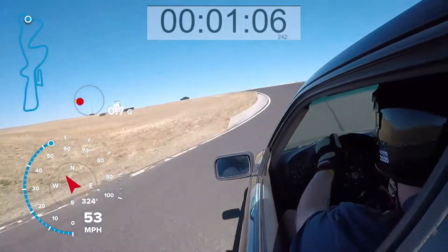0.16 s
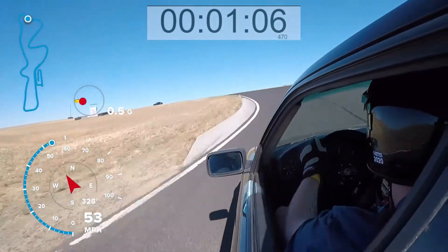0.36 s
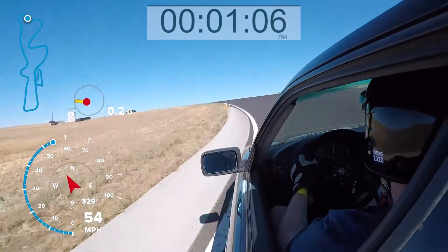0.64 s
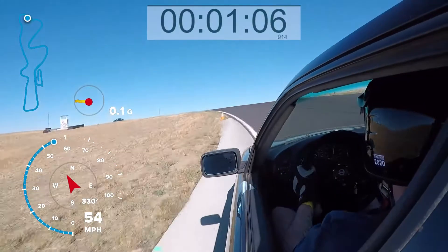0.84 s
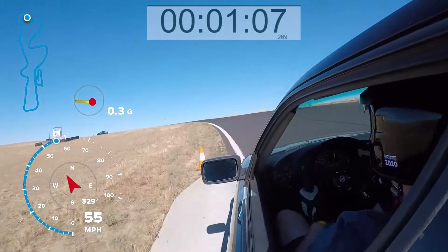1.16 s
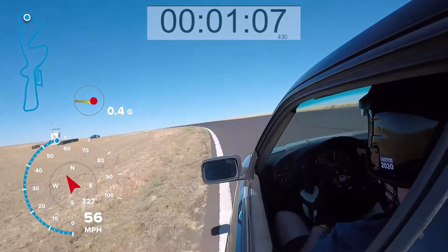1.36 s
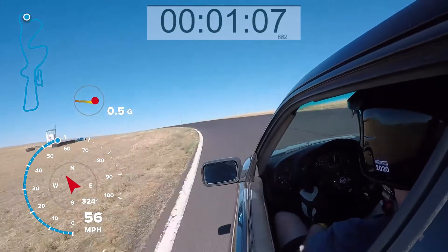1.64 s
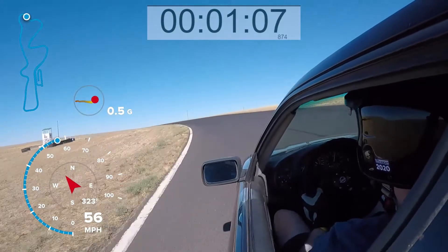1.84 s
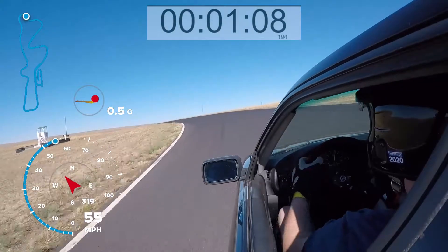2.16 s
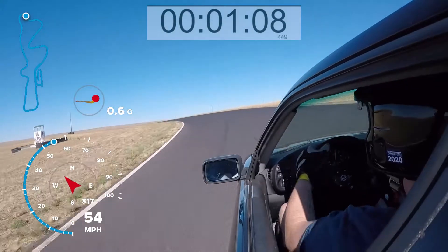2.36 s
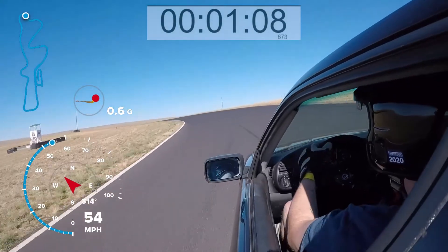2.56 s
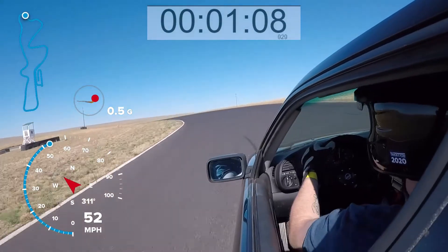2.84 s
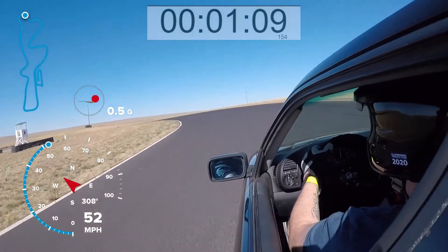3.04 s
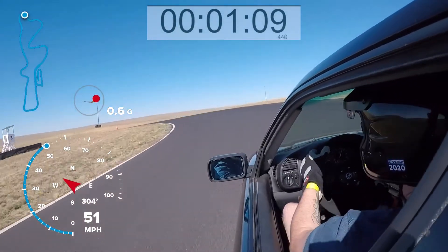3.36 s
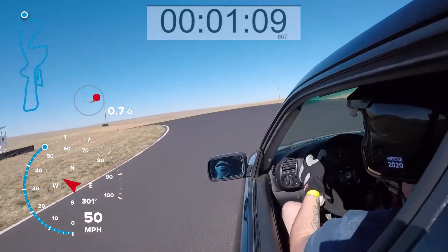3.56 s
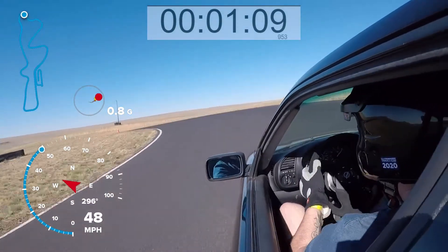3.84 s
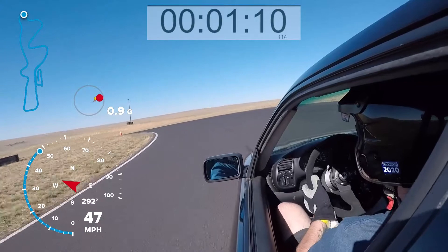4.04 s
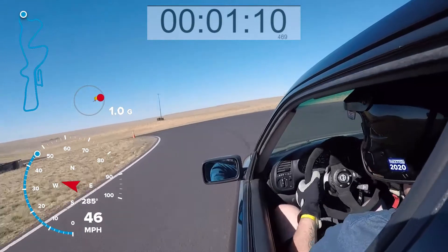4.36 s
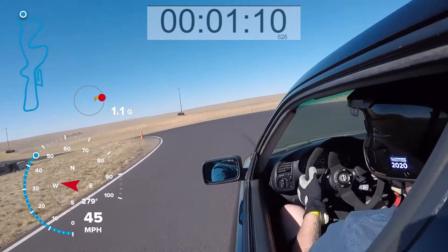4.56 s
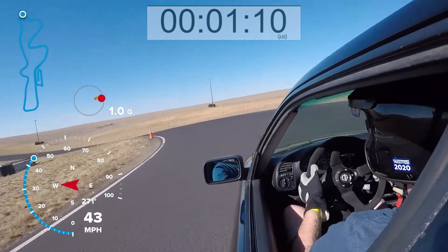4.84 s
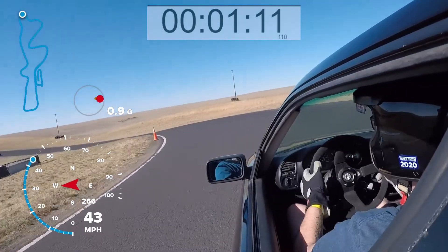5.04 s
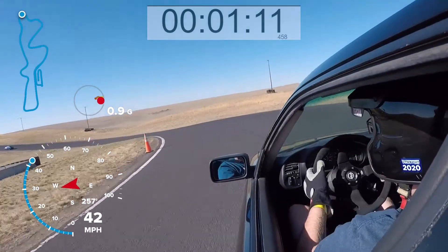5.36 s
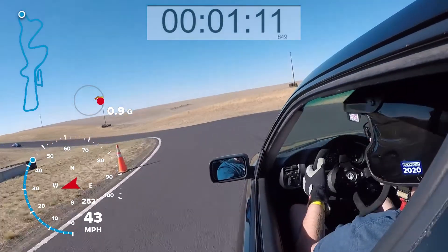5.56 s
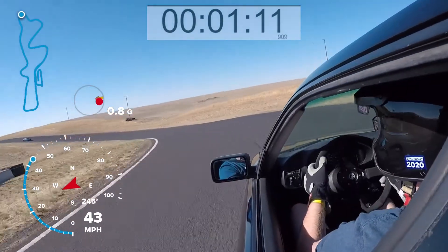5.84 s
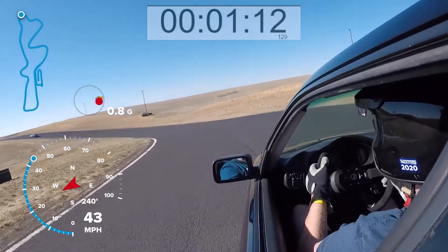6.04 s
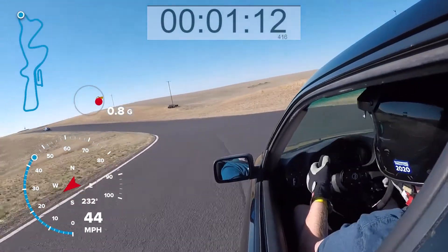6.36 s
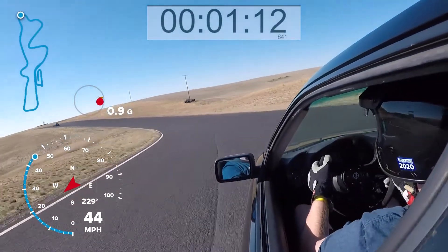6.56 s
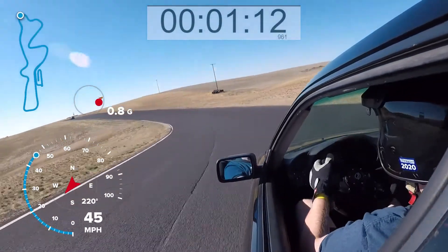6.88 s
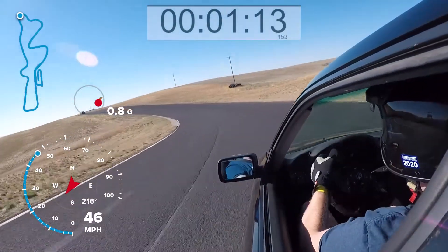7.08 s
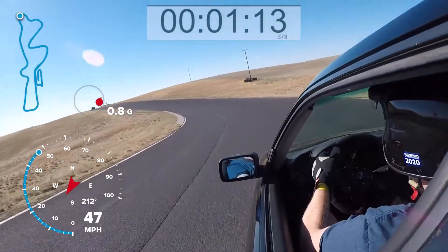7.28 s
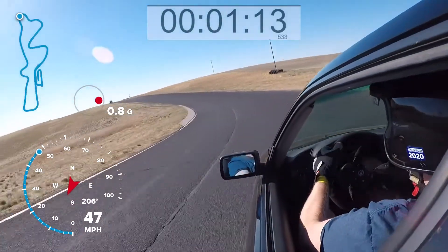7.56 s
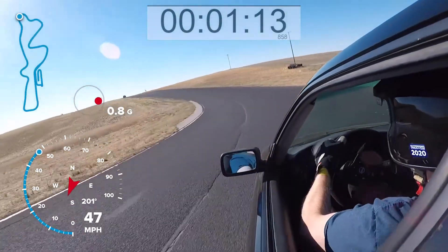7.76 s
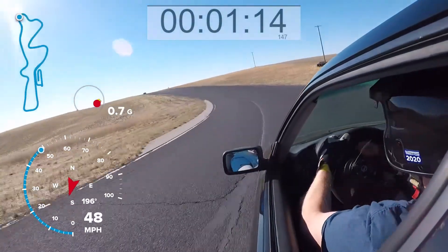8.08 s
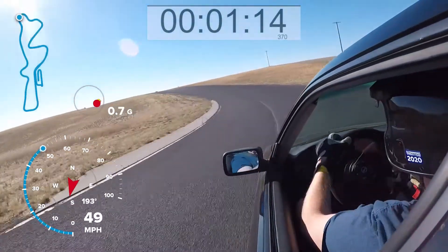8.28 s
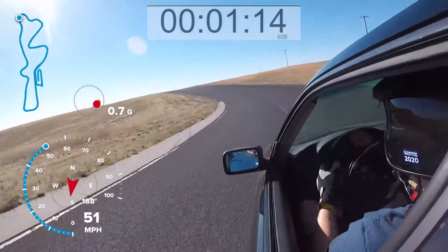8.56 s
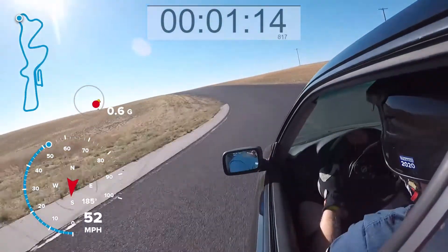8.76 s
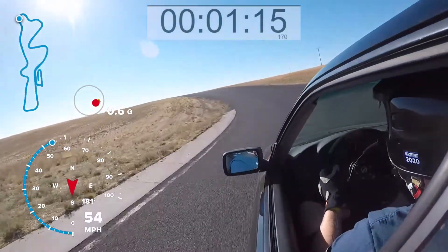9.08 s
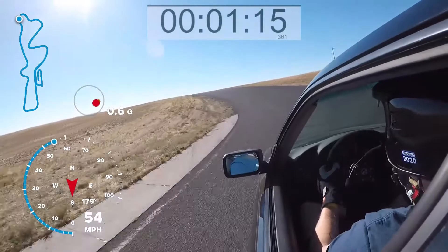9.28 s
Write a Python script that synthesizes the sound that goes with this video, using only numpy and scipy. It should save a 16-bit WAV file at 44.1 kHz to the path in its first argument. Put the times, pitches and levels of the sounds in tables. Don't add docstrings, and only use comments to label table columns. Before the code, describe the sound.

Loud raspy race-car exhaust at an open window: full pull, popping lift-off, quick downshift blip, rising howl, banging upshift, with tyre roar and wind rumble.

```python
import sys
import numpy as np
from scipy import signal
from scipy.fft import rfft, irfft, next_fast_len
from scipy.io import wavfile
from scipy.ndimage import uniform_filter1d, map_coordinates

SR = 44100
rng = np.random.default_rng(int(sys.argv[2]) if len(sys.argv) > 2 else 0)


def to_linear_factor(level_db):
    exponent = np.asarray(level_db, float) / 20
    return 10 ** exponent


def dump(signal):
    limited = np.clip(np.atleast_2d(signal).T, -1, 1)
    pcm = np.round(limited * 32767).astype(np.int16)
    wavfile.write(sys.argv[1], SR, pcm)


N = 415422
STRIDE = 64

# (time [s], speed [km/h])
SPEED_KMH = [(0, 85), (1.7, 90), (3.75, 79), (5.3, 68), (7.6, 75), (9.42, 88)]
# (frequency [Hz], density [dB/Hz])
BUFFET_SPECTRUM_DB = [(8, -120), (14, -13), (26, 5), (40, -3.5), (85, -12), (140, -19), (300, -74.5),
                      (600, -120)]
# (time [s], peak [dB])
GUSTS_DB = [(.07, -25.5), (0.349, -27), (.55, -26), (1.129, -17), (1.63, -21.5), (1.86, -23), (2.269, -21),
            (3.0, -21), (3.55, -25.5), (4.1, -25.5), (5.94, -27), (6.45, -34.5), (7.03, -18.5), (7.34, -29),
            (7.51, -28), (8.78, -34), (9.36, -23.5)]
# (frequency [Hz], density [dB/Hz])
ROAD_SPECTRUM_DB = [(35, -19.5), (60, -6.5), (96, -8), (166, -7.5), (300, -12.5), (650, -20), (800, -19.5),
                    (900, -23.5), (1430, -24.5), (2080, -36), (4940, -48.5), (9000, -64.5), (12000, -78),
                    (16000, -93), (22000, -120)]
# (time [s], peak [dB])
LINKAGE_DB = [
    (1.45, -52),
    (2.93, -40),
    (2.998, -49),
    (3.955, -51),
    (4.343, -37),
    (6.998, -43),
    (7.346, -38),
]
# (time [s], peak [dB], pitch [Hz], hold [s])
AFTERFIRES = [(0.032, -15.5, 112, 0.033), (1.401, -8, 77.6, 0.042), (1.455, -10, 90.6, 0.079),
              (1.618, -16, 83, 0.015), (2.254, -13, 73, 0.012), (2.87, -16, 70, 0.027),
              (2.929, -8.5, 77.1, 0.017), (2.964, -10.5, 81, 0.018), (3.065, -21, 70, 0.01),
              (3.078, -15, 74.6, 0.0058), (4.335, -2.5, 82.83, 0.0017), (4.375, -11, 84.1, 0.0068),
              (6.876, -6, 86.1, 0.03), (6.96, -7.5, 78, 0.045), (7.047, -9.5, 86.9, 0.022),
              (7.346, -10, 69.6, 0.0095), (8.775, -14, 68.9, 0.015)]
# (time [s], four-stroke cycle rate [Hz])
CYCLE_RATE_HZ = [(0, 34.18), (1.05, 35.43), (2.45, 32.68), (2.645, 30.94), (2.85, 37.82), (3.05, 38.57),
                 (3.3, 41.34), (3.49, 45.26), (3.7, 43.57), (4.28, 41.15), (4.95, 41.06), (5.5, 41.83),
                 (6.82, 45.83), (7.34, 38.6), (7.45, 37.8), (7.63, 30.64), (7.75, 31.99), (9.42, 36.47)]
# (time [s], exhaust blast [dB], load [0-1])
THROTTLE_DB_LOAD = [(0, -33, 0.96), (1.03, -32, 0.91), (1.26, -51.5, .55), (1.46, -61.5, 0.1),
                    (2.655, -70, 0), (2.666, -36.5, 0.7), (2.79, -37, 0.96), (2.95, -59, 0.04),
                    (4.12, -58, 0.08), (4.56, -62.5, 0.39), (4.9, -41, 0.84), (5.88, -31.5, 0.96),
                    (6.81, -29, 0.9), (6.915, -52.5, 0.1), (7.33, -53.5, 0), (7.37, -51, 0.55),
                    (7.49, -37.5, 0.87), (9.42, -29.5, .95)]
# (cycle rate [Hz], gain [dB])
SHAKE_GAIN_DB = [(32, 7.5), (35, 9), (38, 8), (42, 1.5), (46, 7.5)]
# (frequency [Hz], density [dB/Hz])
VALVE_SPECTRUM_DB = [(1500, -65), (2700, -5), (3600, 1.5), (4900, -20.5), (5600, -15.5), (6300, -23.5),
                     (8000, -42), (12000, -91)]
# (frequency [Hz], gain [dB])
BODY_GAIN_DB = [(100, -40), (250, -5), (330, -2.5), (460, -8), (600, 0), (680, -9), (745, 3.5), (800, -2),
                (860, -25), (1200, -9), (1500, -40.5)]
BLOCK_ORDERS = [8, 9, 11, 13, 15, 16, 17, 18, 19, 21, 22, 23, 24]
BLOCK_LOAD_DB = [0.94, 9, -0.5, 0.67, 6.5, 1, 3.5, -5.5, 2.5, 10.5, 8, 2, 6]
BLOCK_COAST_DB = [4, 0.5, 14.5, 4, 10.5, 4.5, 3.5, 4.5, 3.5, 2, 8, 3, 13]
EXHAUST_ORDERS = [3, 6, 12, 18, 9, 15]
# (frequency [Hz], gain [dB])
PIPE_LOAD_DB = [
    [(93, -27), (99, -29.5), (106, -42.5), (120, -41.5), (135, -35)],
    [(186, -12.5), (197, -13), (212, -17), (248, -24.5), (270, -20.5), (276, -18.5)],
    [(375, -30.5), (420, -31.5), (500, -31.5), (528, -33.5), (545, -24)],
    [(570, -71), (610, -53), (636, -30.5), (700, -15), (748, -22), (795, -23.5), (825, -36)],
]
# (frequency [Hz], gain [dB])
PIPE_SHUT_DB = [
    [(93, -17.5), (103, -23), (112, -39), (120, -55.5), (135, -37)],
    [(188, -25.5), (200, -33), (228, -40.5), (250, -40), (275, -49)],
    [(375, -45.5), (410, -44.5), (470, -49.5), (545, -47)],
    [(570, -56), (620, -53), (715, -73.5), (750, -44), (790, -47.5), (820, -46.5)],
]
RINGING_ORDERS = [24, 27, 36, 39, 42, 45, 51, 69, 114]
RINGING_DB = [-9.5, -17.5, -11, -32, -15, -20, -31, -27, -31.5]
# (cycle rate [Hz], share [0-1])
RASP_SHARE = [(35, .8), (38, .65), (40.5, .08), (42, .08), (44, .13), (46, .22)]
# (size [dB], manifold runner lag [ms])
CYLINDERS_DB_MS = [(14.5, 0.054), (11.5, 0.11), (9.5, -0.06), (12, 0.12), (13.5, -0.095), (16, 0.21)]
# (frequency [Hz], gain [dB])
FIRING_GAIN_DB = [(200, -57), (380, 0.5), (640, 1.5), (760, 7), (930, -5.5), (1200, -9.5), (1800, -3),
                  (2050, -24.5), (2200, -8.5), (3000, -24), (4850, -26.5), (5600, -36.5), (6400, -31),
                  (9000, -35), (15500, -56)]
# (frequency [Hz], width [Hz], gain [ratio])
TAILPIPE_MODES = [(2185, 49, 2.3), (3060, 44, 1), (4000, 170, 1), (4820, 55, 1.6), (5300, 89, 4),
                  (5960, 100, 0.97), (6450, 69, 5), (6860, 83, 1.5), (7640, 60, 1.5), (8300, 200, 1.5),
                  (8950, 300, 1.5), (10200, 590, 1.4), (12500, 500, 1.2)]
# (frequency [Hz], density [dB/Hz])
JET_SPECTRUM_DB = [(150, -44), (300, -18), (740, -10), (1000, -11), (1480, -3), (2000, -15), (2500, -16),
                   (2950, -16), (4400, -20.5), (9000, -31.5), (12000, -37.5), (15600, -53)]
# (time [s], extra path [ms])
ROAD_ECHO_MS = [(0, 1.11), (.5, 1.1), (.87, 1.544), (1.1, 1.32), (1.9, 1.8), (2.7, 1.563), (4.75, 1.76),
                (5.5, 1.704), (7.4, 1.64), (7.65, 1.383), (8.6, 1.476), (8.87, 1.3), (9.15, 1.415),
                (9.42, 1.314)]
# (delay [ms], gain [ratio])
PANEL_ECHOES_MS = [(.65, .22), (1.01, .15)]


def unit(x):
    return x / np.sqrt(np.mean(x ** 2) + 1e-20)


def along(points, hz):
    f, v = np.transpose(points)
    return np.interp(np.log(hz + 1), np.log(f + 1), v)


def curves(rows):
    s, *cols = np.transpose(rows)
    return [np.interp(np.arange(N) / SR, s, c) for c in cols]


def spread(slow):
    return np.interp(np.arange(N), np.arange(len(slow)) * STRIDE, slow)


def wobble(rate_hz, slow=False):
    knots = rng.standard_normal(int(N * rate_hz / SR) + 4)
    curve = map_coordinates(knots, [np.arange(0, N, STRIDE) * rate_hz / SR])
    return curve if slow else spread(curve)


def filtered(x, response):
    m = next_fast_len(N + SR // 8, True)
    return irfft(rfft(x, m) * response(np.fft.rfftfreq(m, 1 / SR)), m)[..., :N]


def causal(spectrum):
    def response(hz):
        cep = irfft(np.log(np.maximum(to_linear_factor(along(spectrum, hz)), 1e-6)))
        cep[1:len(cep) // 2] *= 2
        cep[len(cep) // 2 + 1:] = 0
        return np.exp(rfft(cep))[:len(hz)]
    return response


def rush(spectrum, patchy_db):
    z = signal.stft(rng.standard_normal(N), nperseg=512, padded=True)[2].astype(np.complex64)
    field = uniform_filter1d(rng.standard_normal(z.shape), size=6, axis=0)
    field = uniform_filter1d(field, size=10, axis=1)
    noise = signal.istft(z * to_linear_factor(patchy_db * unit(field)), nperseg=512)[1][:N]
    return unit(filtered(noise, lambda hz: to_linear_factor(along(spectrum, hz))))


def pulses(seconds, sizes):
    at = seconds[:, None] * SR
    taps = np.floor(at) + np.arange(-7, 9)
    window = np.cos(np.pi * (taps - at) / 16) ** 2
    weight = sizes[:, None] * np.sinc(taps - at) * window
    return np.bincount(np.clip(taps, 0, N).astype(int).ravel(), weight.ravel(), N + 1)[:N]


def wind_buffet():
    level_db, speed_power = -32, 6
    buffet = unit(to_linear_factor(1.6 * wobble(8)) * rush(BUFFET_SPECTRUM_DB, patchy_db=2.0))
    return to_linear_factor(level_db) * (curves(SPEED_KMH)[0] / 80) ** speed_power * buffet


def window_gusts():
    throb_hz, half_length_s = 32.1, 0.045
    t = np.arange(0, N, STRIDE) / SR
    pitch_hz = throb_hz * np.exp(0.22 * rng.standard_normal(len(GUSTS_DB)))
    gusts = np.zeros(len(t))
    for (s, db), hz in zip(GUSTS_DB, pitch_hz):
        swell = to_linear_factor(db + 3) * np.exp(-((t - s) / half_length_s) ** 2)
        gusts += swell * np.cos(2 * np.pi * hz * (t - s))
    return filtered(spread(gusts), lambda hz: 1 / (1 + (hz / 150) ** 4))


def road_roar(shake_db):
    level_db, shake_share = -34.5, 1
    level = to_linear_factor(level_db + shake_share * shake_db) * to_linear_factor(0.56 * wobble(5))
    return level * rush(ROAD_SPECTRUM_DB, patchy_db=0.8)


def linkage():
    t60_s, attack_s = 0.053, 0.0028
    out, t = np.zeros(N), np.arange(SR // 20) / SR
    for s, db in LINKAGE_DB:
        shape = to_linear_factor(db - 60 * t / t60_s) * (1 - np.exp(-t / attack_s))
        out[round(s * SR):][:len(t)] += shape * rng.standard_normal(len(t))
    return filtered(out, lambda hz: 1 / (1 + (hz / 7000) ** 2))


def driver():
    cycle_hz = curves(CYCLE_RATE_HZ)[0]
    blast_db, load = curves(THROTTLE_DB_LOAD)
    load = np.clip(load, 0, 1)
    return cycle_hz, blast_db, load, load * along(SHAKE_GAIN_DB, cycle_hz)


def afterfire(load):
    attack_s, choke_t60_s, choke_growth = 0.0076, 0.051, 0.81
    burble_hz, burble_width_hz, burble_db = 87, 15, -33.5
    out, t = np.zeros(N + SR), np.arange(SR // 3) / SR
    for s, db, hz, hold in AFTERFIRES:
        decay_db = 60 * np.maximum(t - hold, 0) / (choke_t60_s + choke_growth * hold)
        shape = (1 - np.exp(-t / attack_s)) * to_linear_factor(db - decay_db)
        out[round(s * SR):][:len(t)] += shape * np.sin(2 * np.pi * hz * t * (1 + 0.077 * t))
    burble = filtered(rng.standard_normal(N), lambda hz: np.exp(-((hz - burble_hz) / burble_width_hz) ** 2))
    return out[:N] + to_linear_factor(burble_db) * (1 - load) * unit(burble)


def stumble():
    lost_share, length_s, long_bang_s = 0.29, 0.045, 0.052
    t = np.arange(0, N, STRIDE) / SR
    bang = sum(hold / long_bang_s * np.exp(-((t - s - hold) / length_s) ** 2)
               for s, _, _, hold in AFTERFIRES)
    return spread(1 - lost_share * np.minimum(bang, 1))


def valve_clatter(cycles):
    gate = 0.19 + np.exp(-6 * (cycles % 1))
    return to_linear_factor(-70.0 + wobble(1.97)) * unit(gate * rush(VALVE_SPECTRUM_DB, patchy_db=7.5))


def block_orders(cycles, cycle_hz, load):
    rate_hz, pull = cycle_hz[::STRIDE], load[::STRIDE]
    extra_db = {k: pull * on + (1 - pull) * off
                for k, on, off in zip(BLOCK_ORDERS, BLOCK_LOAD_DB, BLOCK_COAST_DB)}
    turn = np.exp(2j * np.pi * (cycles % 1)).astype(np.complex64)
    wave, out = turn ** 3, np.zeros(N)
    for k in range(4, 28):
        wave = wave * turn
        gain_db = along(BODY_GAIN_DB, k * rate_hz) + extra_db.get(k, -5) + 1.5 * wobble(9, slow=True)
        out += spread(to_linear_factor(gain_db)) * (wave * complex(np.exp(1.2j * k * k))).imag
    return unit(out)


def block_drone(cycles, cycle_hz, load, shake_db):
    coast_db, slack_db, coast_db_per_hz = -36, -2.5, 1.3
    slack = 1 - (2 * load - 1) ** 2
    faster_hz = np.minimum(cycle_hz - cycle_hz.mean(), 1)
    level_db = coast_db + shake_db + slack_db * slack + coast_db_per_hz * (1 - load) * faster_hz
    return to_linear_factor(level_db) * block_orders(cycles, cycle_hz, load)


def exhaust_hum(cycles, cycle_hz, blast_db, load, rasp):
    rate_hz, pull, gas_db, rough = (curve[::STRIDE] for curve in (cycle_hz, load, blast_db, rasp))
    order_db = [pull * along(pipe, k * rate_hz) + (1 - pull) * along(shut, k * rate_hz)
                for k, pipe, shut in zip(EXHAUST_ORDERS, PIPE_LOAD_DB, PIPE_SHUT_DB)]
    bank_db = order_db[2]
    order_db += [bank_db - 8.0, bank_db - 12 * rough - 1.5]
    tuned_db = np.minimum(order_db[3], gas_db + 8.0) + 20 * np.log10(1 - rough + .01)
    order_db += [tuned_db + db for db in RINGING_DB]
    hum = np.zeros(N)
    for k, db in zip(EXHAUST_ORDERS + RINGING_ORDERS, order_db):
        level = np.sqrt(2) * spread(to_linear_factor(db + 0.35 * wobble(25, slow=True)))
        hum += level * np.sin(2 * np.pi * k * cycles + k + .12 * wobble(30))
    return hum


def tailpipe_modes(hz):
    return 1 + sum(gain * 1j * hz * width / (centre * centre - hz * hz + 1j * hz * width)
                   for centre, width, gain in TAILPIPE_MODES)


def exhaust_blast(cycles, blast_db, rasp):
    count = int(cycles[-1] * len(CYLINDERS_DB_MS))
    fired_s = np.interp(np.arange(count) / len(CYLINDERS_DB_MS), cycles, np.arange(N) / SR)
    size_db, lag_ms = np.resize(CYLINDERS_DB_MS, (count, 2)).T
    chance = rng.standard_normal((count, 3))
    arrived_s = fired_s + (lag_ms + .005 * chance[:, 0]) / 1000
    firings = pulses(arrived_s, to_linear_factor(size_db + .6 * chance[:, 1]))
    clear = unit(filtered(firings, lambda hz: causal(FIRING_GAIN_DB)(hz) * tailpipe_modes(hz)))
    kicks = pulses(fired_s, to_linear_factor(.5 * size_db + 3.3 * chance[:, 2]))
    puffs = signal.lfilter([1], [1, -np.exp(-2 * np.pi * 90 / SR)], kicks)
    jet = unit((2.8 + unit(puffs)) * rush(JET_SPECTRUM_DB, patchy_db=0.5))
    blast = np.sqrt(1 - rasp) * clear + np.sqrt(rasp) * jet
    fizz = filtered(blast, lambda hz: 1 / (1 + (7500 / (hz + 1)) ** 6))
    top_loss = 1 - to_linear_factor(np.minimum(.5 * (blast_db + 36), 0))
    return to_linear_factor(blast_db + 8.5 + 0.7 * wobble(12)) * (blast - top_loss * fizz)


def tailpipe_to_microphone(x):
    def dull(hz):
        return 1 / (1 + (hz / 6500) ** 4)

    def panels(hz):
        echoes = sum(gain * np.exp(-2j * np.pi * hz * ms / 1000) for ms, gain in PANEL_ECHOES_MS)
        return 1 + dull(hz) * echoes

    road = map_coordinates(x, [np.arange(N) - curves(ROAD_ECHO_MS)[0] * SR / 1000])
    return filtered(x, panels) + 0.43 * filtered(road, dull)


def engine(cycle_hz, blast_db, load, shake_db):
    rasp = np.clip(along(RASP_SHARE, cycle_hz), 0, 1)
    cycles = np.cumsum(cycle_hz) / SR
    hum = exhaust_hum(cycles, cycle_hz, blast_db, load, rasp)
    drone = block_drone(cycles, cycle_hz, load, shake_db)
    blast = tailpipe_to_microphone(exhaust_blast(cycles, blast_db, rasp))
    return stumble() * (hum + drone) + blast + valve_clatter(cycles)


def scene():
    cycle_hz, blast_db, load, shake_db = driver()
    air = wind_buffet() + window_gusts() + road_roar(shake_db)
    mix = air + linkage() + afterfire(load) + engine(cycle_hz, blast_db, load, shake_db)
    return mix[None]


def top_cut(x):
    return signal.sosfilt(signal.butter(12, 15670, fs=SR, output="sos"), x)


def record(dry):
    top, hardness = .315, 14
    mix = dry / (1 + np.abs(dry / top) ** hardness) ** (1 / hardness)
    return top_cut(mix)


dry = scene()
out = record(dry)
dump(out)
```